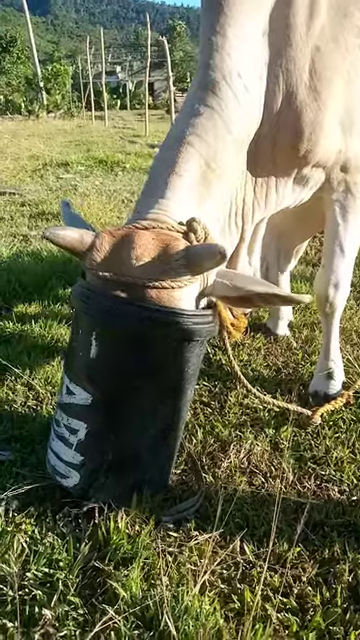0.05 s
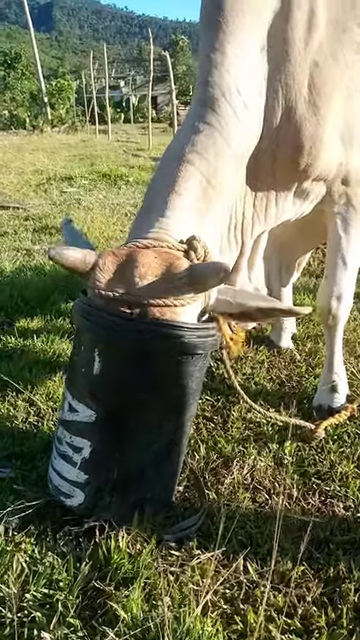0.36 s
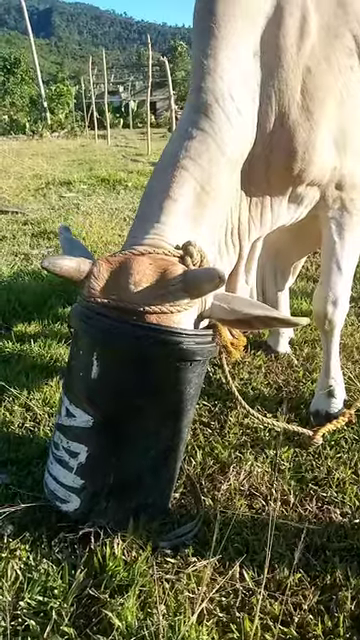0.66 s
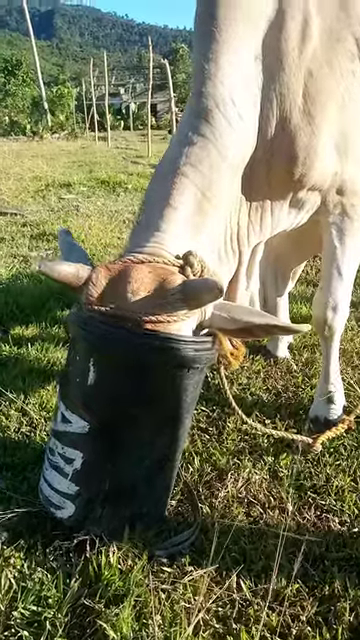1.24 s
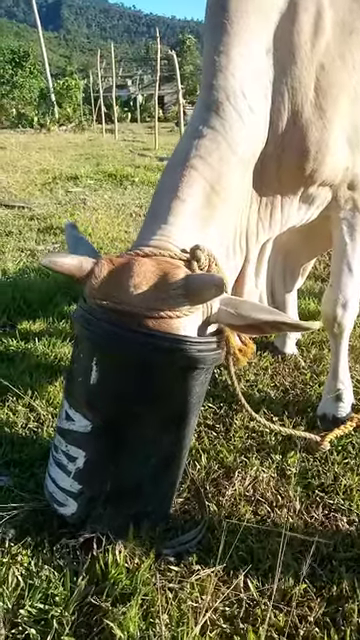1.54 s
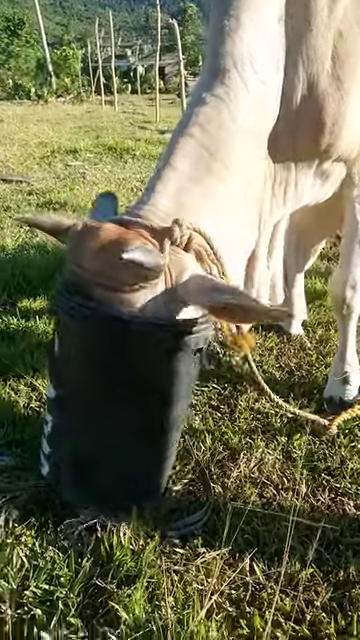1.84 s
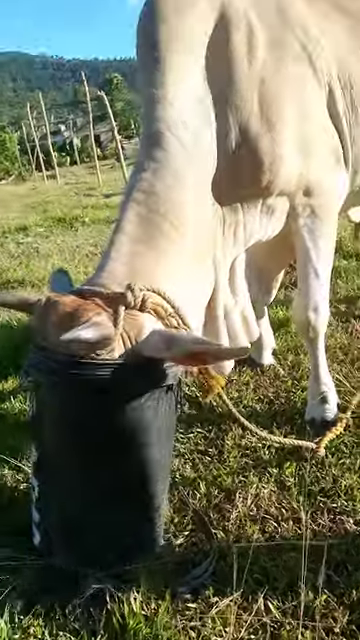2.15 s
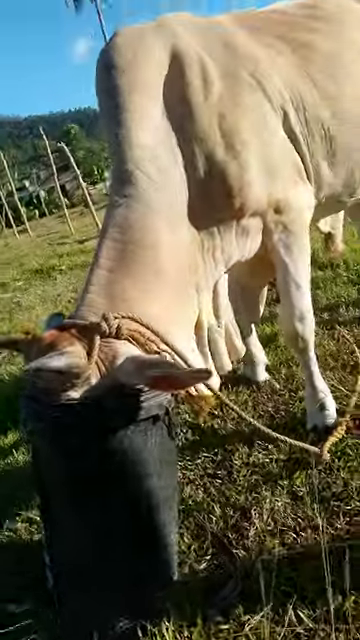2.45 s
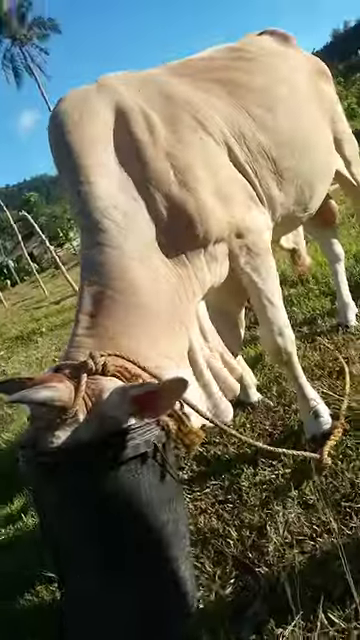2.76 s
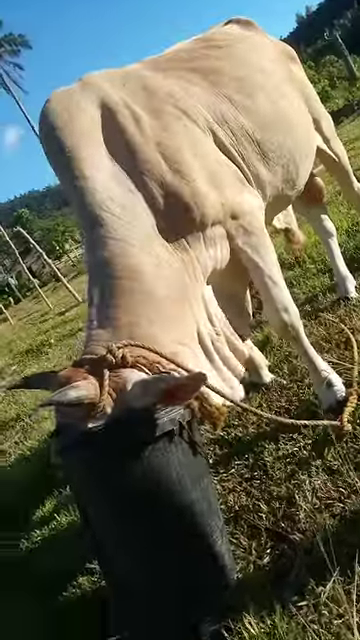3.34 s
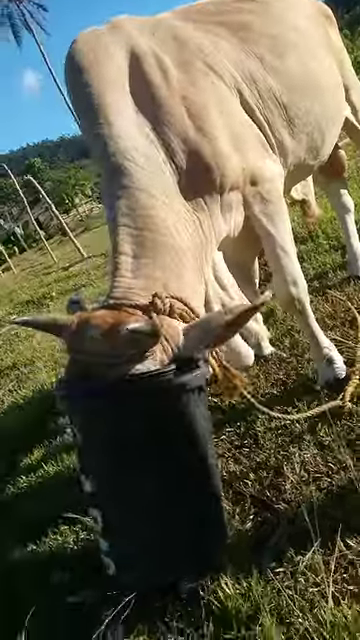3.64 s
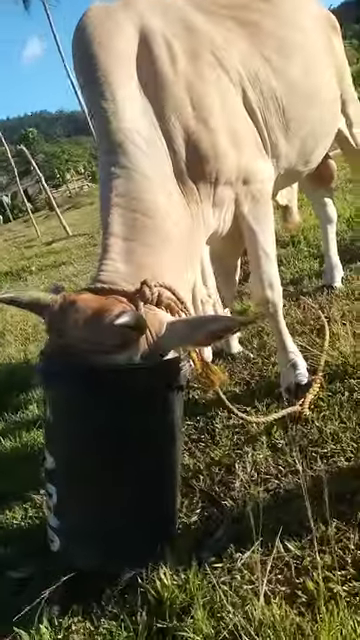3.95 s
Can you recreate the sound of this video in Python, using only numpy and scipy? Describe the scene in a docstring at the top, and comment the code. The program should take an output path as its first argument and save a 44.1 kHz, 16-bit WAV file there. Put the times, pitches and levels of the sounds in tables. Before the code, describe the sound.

A cow snorting softly while feeding from a plastic bucket, with wind buffeting the microphone.

```python
"""Wind thumps and hollow snorts: a cow feeds with its head deep in a plastic bucket, in an open field.
It blows through its nostrils about every 0.8 s, in one or two puffs, coloured by the bucket's air.
Its muzzle rustles and clicks in the feed, and the halter scrapes the rim.
Gusts buffet the microphone over a faint hiss; a very high fizz swells four times."""
import sys
import numpy as np
from scipy import signal
from scipy.fft import rfft, irfft
from scipy.io import wavfile
from scipy.ndimage import uniform_filter1d

SR = 44100
rng = np.random.default_rng(int(sys.argv[2]) if len(sys.argv) > 2 else 0)


def store_wav(level_fs):
    """Save 16-bit WAV to argv[1]."""
    pcm = np.round(np.clip(np.atleast_2d(level_fs), -1, 1) * 32767)
    wavfile.write(sys.argv[1], SR, pcm.T.astype(np.int16))


N = 176400
TIME_S = np.arange(N) / SR
FREQ_HZ = np.fft.rfftfreq(N, 1 / SR)

# Nostril puffs. Each row: start, crest and end in seconds; level, swell to the crest, treble shelf
# and jet hiss in dB; rasp pitch in Hz, rasp gain in dB.
NOSTRIL_PUFFS = [(0.246, 0.33, 0.45, -51, 6.5, -6, -18, 2320, -13),
                 (1.051, 1.105, 1.194, -48.5, 12, -7.5, -27.5, 2370, -13),
                 (2.013, 2.01, 2.08, -53.5, 14, -1, -37, 2210, -10.5),
                 (2.079, 2.122, 2.14, -45, 14, 1.5, -30, 2340, -10.5),
                 (2.708, 2.733, 2.80, -52, 4, 2, -25, 2050, -13.5),
                 (2.808, 2.892, 2.913, -41, 3.5, 2, -23.5, 2230, -11),
                 (3.587, 3.632, 3.646, -50.5, 12.5, -20, -42, 2350, -29),
                 (3.70, 3.732, 3.742, -51, 5, -5, -24, 2410, -13)]
# Air leaving the nostrils. Each row: frequency in Hz, density in dB.
BREATH_SPECTRUM = [(100, -11), (300, -3), (480, -0.5), (850, -5), (1030, -10.5), (1250, -8), (1500, -15.5),
                   (1700, -12), (2600, -14), (3200, -21), (4300, -35.5), (5200, -38.5), (10000, -38),
                   (16000, -70)]
# Air resonances of the bucket. Each row: frequency in Hz, width in Hz, lift in dB.
BUCKET_MODES = [(599, 28, 3.5), (800, 89, 4), (1293, 67, 3.5), (1705, 27, 7), (1850, 14, 0),
                (2280, 33, -0.5), (3350, 61, -2), (4030, 74, 4.5)]
# Tones blown in the bucket. Each row: centre and half length in seconds, pitch in Hz, level in dB.
BUCKET_HOOTS = [(0.35, 0.064, 592, -55), (0.37, 0.035, 810, -54), (0.38, 0.027, 386, -45),
                (.48, 0.025, 540, -68.5), (.632, 0.014, 565, -62.5), (1.108, 0.016, 595, -42),
                (1.115, 0.0076, 715, -44), (1.143, 0.012, 595, -47.5), (2.84, 0.039, 670, -52),
                (2.897, 0.016, 2295, -48.5), (3.635, 0.013, 785.2, -53)]
# Muzzle rubbing the feed. Each row: time in seconds, level in dB.
RUB_LEVELS = [(0, -71.5), (.5, -64), (.58, -68.5), (.95, -84), (1.22, -68.5), (1.45, -112), (1.6, -72.5),
              (1.75, -59), (1.89, -63), (1.98, -61.5), (2.08, -63), (2.2, -67), (2.3, -62.5), (2.39, -65.5),
              (2.46, -63), (2.68, -59), (2.95, -62), (3.05, -68), (3.45, -74.5), (3.6, -62.5),
              (3.73, -60.5), (3.79, -65.5), (4, -71.5)]
# Feed rustle. Each row: frequency in Hz, density in dB.
FEED_SPECTRUM = [(200, -32), (430, -8.5), (570, 3.5), (870, 0), (1050, -5), (1300, -5), (1480, -11),
                 (1800, -0.5), (2500, -1.5), (3200, -11), (4100, -9.5), (5200, -16), (6600, -11.5),
                 (8300, -19.5), (10800, -11.5), (12500, -40), (15500, -23)]
# Wet clicks. Each row: centre in seconds, level in dB, pitch and width in Hz, half length in seconds.
MOUTH_CLICKS = [(0.543, -60.5, 7600, 1790, 0.0028), (0.627, -55, 2200, 900, 0.021),
                (1.241, -62, 3650, 2500, 0.0094), (1.55, -60, 3180, 3520, 0.0097),
                (1.938, -50.5, 8000, 3000, 0.0017), (2.0289, -43, 2980, 1000, 0.0014),
                (2.029, -41.5, 6740, 1500, 0.00093), (2.0293, -44, 12400, 8000, 0.0006),
                (2.476, -59, 9000, 9000, .0015), (2.498, -49.5, 2210, 1190, 0.0023),
                (2.987, -54, 3180, 2500, 0.0033), (3.187, -66, 14000, 5000, 0.0012),
                (3.344, -54.5, 5330, 705, 0.003), (3.345, -60, 2150, 500, 0.0029),
                (3.812, -45, 2270, 685, 0.0024), (3.813, -46.5, 3080, 700, 0.003)]
# Halter on the rim. Each row: centre and half length in seconds, level in dB.
SCRAPE_SWELLS = [(1.885, 0.079, -58)]
# Rope friction. Each row: frequency in Hz, density in dB.
SCRAPE_SPECTRUM = [(300, -14), (800, 11.5), (1000, 3.5), (1500, -11), (2000, 5.5), (4200, -7), (5200, -15),
                   (7000, -11), (11000, -14), (12500, -34)]
# Gust strength. Each row: time in seconds, level in dB.
GUST_LEVELS = [(0.0, -69), (0.2, -62), (0.26, -43.5), (0.36, -61.5), (0.53, -59.5), (0.57, -57.5),
               (0.63, -65), (0.68, -45), (0.7, -43.5), (0.75, -65), (0.78, -44), (0.81, -62), (0.89, -38.5),
               (0.98, -50), (1.04, -36.5), (1.12, -39.5), (1.16, -56), (1.19, -34.5), (1.285, -31),
               (1.31, -38.5), (1.35, -29.5), (1.39, -37), (1.5, -34.5), (1.53, -58.5), (1.56, -39),
               (1.67, -38.5), (1.69, -46.5), (1.752, -43), (1.765, -32), (1.8, -29.5), (1.87, -45),
               (1.89, -36), (1.93, -40.5), (2.02, -36), (2.19, -45), (2.23, -60), (2.27, -42), (2.31, -55),
               (2.36, -46.5), (2.47, -50.5), (2.51, -46), (2.68, -66), (2.74, -45.5), (2.77, -58),
               (2.81, -46.5), (3.01, -53), (3.09, -35), (3.17, -42.5), (3.22, -43), (3.25, -50.5),
               (3.27, -40.5), (3.4, -47), (3.45, -35), (3.5, -39), (3.56, -35), (3.63, -49.5), (3.65, -42),
               (3.74, -39), (3.8, -59.5), (3.91, -63), (3.93, -48.5), (4.0, -35.5)]
# Wind rumble. Each row: frequency in Hz, density in dB.
RUMBLE_SPECTRUM = [(20, -32), (40, -9.5), (75, 1), (135, 1), (200, -8.5), (300, -24), (450, -44),
                   (800, -61), (2000, -111)]
# Rough edge of strong gusts. Each row: frequency in Hz, density in dB.
EDGE_SPECTRUM = [(60, -27.5), (160, 2.5), (260, 1.5), (400, -9.5), (600, -20), (900, -41), (1400, -60),
                 (3000, -87)]
# Hard gusts tearing at the microphone port. Each row: centre and half length in seconds, level in dB.
TEAR_SWELLS = [(1.332, 0.011, -59), (1.776, 0.012, -45)]
# Tearing noise at the port. Each row: frequency in Hz, density in dB.
TEAR_SPECTRUM = [(250, -29), (500, 0), (750, 6), (1100, -14), (1500, -33), (3000, -61)]
# Single eddies hitting the microphone. Each row: centre in seconds, level in dB, width in seconds.
EDDIES = [(0.575, -41.5, 0.0044), (0.672, -38, 0.0018), (0.685, -38, 0.0029), (.883, -32.5, 0.0015),
          (1, -33, 0.0015), (1.119, -26, 0.0015), (1.262, -24.5, 0.0015), (1.287, -28, 0.0011),
          (1.323, -29, 0.00096), (1.364, -22.5, 0.0017), (1.504, -21, 0.0032), (1.765, -25, .0014),
          (1.795, -24.5, 0.0011), (2.18, -31.5, 0.0028), (3.085, -25, 0.0019), (3.221, -29.5, 0.003),
          (3.284, -24, 0.0026), (3.56, -31, 0.0012), (3.732, -29.5, 0.0023), (3.941, -30, 0.0019),
          (3.991, -29, 0.0032)]
# Swells of high fizz. Each row: centre and half length in seconds, level in dB.
FIZZ_SWELLS = [(1.88, .12, -78), (2.72, 0.18, -73), (3.2, 0.093, -81), (3.65, 0.2, -71.5)]
# Colour of the fizz. Each row: frequency in Hz, density in dB.
FIZZ_SPECTRUM = [(2000, -21), (4000, -6), (7000, 0), (11000, 12), (13000, 0), (15500, 12)]
# Background hiss. Each row: frequency in Hz, density in dB.
HISS_SPECTRUM = [(30, 11), (120, 8), (350, -22.5), (700, -6), (1400, -3), (2300, 1.5), (3000, -9),
                 (3800, 0.5), (5100, -10.5), (6200, -6.5), (8000, -15.5), (9500, -3.5), (10800, -0.5),
                 (11500, -4.5), (12300, -30), (16000, -17.5)]


def nostril_puffs(rise_s=0.0086, release_s=0.0089, sag_db=2.5, brighten_db=4, flutter_hz=69.6):
    """Fluttering, rasping breath swells, sags and stops; it brightens as the nostrils narrow."""
    out = np.zeros(N)
    air = colour(BREATH_SPECTRUM) * bucket_gain()
    treble = FREQ_HZ ** 2 / (FREQ_HZ ** 2 + 1420 ** 2)
    spray = amp(-62) * noise(band(hz=7300, width_hz=6500) ** 2)
    rattle = unit(np.exp(0.23 * noise(band(hz=170, width_hz=170))))
    for start_s, crest_s, end_s, db, swell_db, treble_db, jet_db, rasp_hz, rasp_db in NOSTRIL_PUFFS:
        flow = amp(db + np.interp(TIME_S, [start_s, crest_s, end_s], [-swell_db, 0, -sag_db]))
        flow *= np.exp(-np.maximum(start_s - TIME_S, 0) / rise_s)
        flow *= np.exp(-np.maximum(TIME_S - end_s, 0) / release_s)
        narrowing = amp(brighten_db * np.interp(TIME_S, [start_s, end_s], [-0.5, 0.5]))
        rush = noise(air * amp(treble_db * treble))
        top = filtered(rush, treble)
        rasp = amp(rasp_db) * noise(band(rasp_hz, width_hz=370) * air)
        jet = amp(jet_db) * noise(band(hz=4070, width_hz=2900) ** 2)
        out += flow * (rush - top + rattle * (narrowing * top + rasp) + narrowing ** 2 * jet)
        out += spray * (flow / amp(-41)) ** 2  # mainly on hard puffs
    flutter = np.exp(0.21 * noise(band(0, 2 * flutter_hz)))
    return out * flutter


def bucket_gain():
    """Air modes of the bucket, as gain per frequency."""
    return amp(sum(lift_db * band(hz, width_hz) for hz, width_hz, lift_db in BUCKET_MODES))


def bucket_echo(x, t60_s=0.12, wet=0.3):
    """Close echoes between the walls add a short hollow tail."""
    time_s = TIME_S[:SR // 4]
    tail = rng.standard_normal(len(time_s)) * amp(-60 * time_s / t60_s)
    echo = signal.fftconvolve(x, tail / np.linalg.norm(tail))[:N]
    return (x + wet * echo) / np.hypot(1, wet)


def bucket_hoots(waver_depth_hz=13, waver_rate_hz=55):
    """Air blown past the rim sounds brief wavering tones, as over a bottle."""
    out = np.zeros(N)
    slow = band(0, 2 * waver_rate_hz)
    for centre_s, half_s, hz, db in BUCKET_HOOTS:
        pitch_hz = hz + waver_depth_hz * noise(slow ** 2)
        roughness = np.exp(0.25 * noise(slow))
        tone = np.sqrt(2) * np.sin(2 * np.pi * np.cumsum(pitch_hz) / SR)
        out += amp(db) * bell(centre_s, half_s) * roughness * tone
    return out


def feed_rustle(body_hz=1130, firm_db=-60):
    """The muzzle rubs through crumbs; firm rubbing brings out the bucket's low body."""
    friction = grainy(patchy(rng.standard_normal(N), depth_db=4.5))
    rustle = unit(filtered(friction, colour(FEED_SPECTRUM) * bucket_gain() ** 0.99))
    body = filtered(rustle, 1 / (1 + (FREQ_HZ / body_hz) ** 8))
    force = level(RUB_LEVELS)
    firmness = np.minimum(force / amp(firm_db), 1)
    return force * (rustle - body + firmness * body)


def mouth_clicks():
    """Short wet smacks of tongue and lips."""
    return sum(amp(db) / 2 * bell(centre_s, half_s) * noise(band(hz, width_hz))
               for centre_s, db, hz, width_hz, half_s in MOUTH_CLICKS)


def halter_scrape():
    """Rope drags over the rim: broad, grainy friction."""
    friction = grainy(noise(1))
    return swells(SCRAPE_SWELLS) * unit(filtered(friction, colour(SCRAPE_SPECTRUM)))


def wind(strong_gust_db=-33.5, edge_growth=1.495, lump_hz=31, low_cut_hz=37):
    """Turbulence at the microphone: rumble, a lumpy edge in gusts, tearing and single eddies."""
    gust = level(GUST_LEVELS)
    out = amp(-0.9) * gust * steadied(noise(colour(RUMBLE_SPECTRUM)))
    edge = steadied(noise(colour(EDGE_SPECTRUM)))
    lumps = np.exp(0.43 * noise(band(0, 2 * lump_hz)))
    out += amp(-44) * (gust / amp(strong_gust_db)) ** edge_growth * unit(edge * lumps)
    out += swells(TEAR_SWELLS) * noise(colour(TEAR_SPECTRUM))
    for centre_s, db, width_s in EDDIES:
        offset = (TIME_S - centre_s) / (2 * width_s)
        out += amp(db) * np.real((1 + 1j * offset) ** -4)  # pressure peak between two dips
    return filtered(out, FREQ_HZ ** 4 / (FREQ_HZ ** 4 + low_cut_hz ** 4))


def treble_fizz():
    """Faint, very high fizz of dense tiny ticks, swelling four times."""
    fizz = ticks(per_s=1500, spread_db=1.5)
    return swells(FIZZ_SWELLS) * unit(filtered(fizz, colour(FIZZ_SPECTRUM)))


def background_hiss(level_db=-71):
    """Faint hiss with a slight random flicker in tone colour."""
    return amp(level_db) * patchy(noise(colour(HISS_SPECTRUM)), depth_db=2.8)


def amp(db):
    """Decibels to gain."""
    return 10 ** (np.asarray(db) / 20)


def unit(x):
    """Scales to rms 1."""
    return x / np.sqrt(np.mean(x ** 2) + 1e-20)


def colour(spectrum):
    """Spectrum table to gain per frequency."""
    hz, db = np.transpose(spectrum)
    return amp(np.interp(np.log(FREQ_HZ + 1), np.log(hz), db))


def band(hz, width_hz):
    """One resonance, as gain per frequency."""
    return 1 / (1 + ((FREQ_HZ - hz) / (width_hz / 2)) ** 2)


def filtered(x, gain):
    """Applies a gain per frequency."""
    return irfft(rfft(x) * gain, N)


def noise(gain):
    """Shaped noise of rms 1."""
    return unit(filtered(rng.standard_normal(N), gain))


def level(points):
    """Level table to gain per sample."""
    return amp(np.interp(TIME_S, *np.transpose(points)))


def bell(centre_s, half_s):
    """Gaussian envelope of peak 1."""
    return np.exp(-((TIME_S - centre_s) / half_s) ** 2)


def swells(rows):
    """Sum of bell envelopes."""
    return sum(amp(db) * bell(centre_s, half_s) for centre_s, half_s, db in rows)


def ticks(per_s, spread_db):
    """Random ticks, most small, a few large."""
    hits = rng.random(N) < per_s / SR
    signs = rng.choice([-1, 1], N)
    sizes = amp(spread_db * np.minimum(rng.exponential(1, N), 4))
    return unit(hits * signs * sizes)


def grainy(x):
    """Adds crumb-like ticks to friction noise."""
    return x + 0.37 * ticks(per_s=220, spread_db=5.5)


def steadied(x, share=0.85, window_samples=800):
    """Takes a share of the chance swells out of a noise."""
    power = uniform_filter1d(x ** 2, window_samples)
    power = abs(uniform_filter1d(power, window_samples)) + 1e-9
    return unit(x / power ** (share / 2))


def patchy(x, depth_db, even_above_hz=10200):
    """Random spectral drift in patches of about 60 ms by 350 Hz, fading out in the top treble."""
    hz, _, frames = signal.stft(x, SR, nperseg=1024, noverlap=768)
    drift = uniform_filter1d(rng.standard_normal(frames.shape), size=10, axis=1)
    patches = unit(uniform_filter1d(drift, size=8, axis=0))
    gain_db = depth_db * patches / (1 + (hz[:, None] / even_above_hz) ** 4)
    _, out = signal.istft(frames * amp(gain_db), nperseg=1024, noverlap=768)
    return unit(out[:N])


def scene():
    """Cow, wind, fizz and hiss in mono."""
    gusts = wind()
    cow = bucket_echo(nostril_puffs() + feed_rustle()) + bucket_hoots() + mouth_clicks()
    return (cow + treble_fizz() + halter_scrape() + gusts + background_hiss())[None]


def record(dry):
    """Band limit at 15.9 kHz."""
    lowpass = signal.firwin(511, 15900, window=("kaiser", 9), fs=SR)
    return signal.oaconvolve(dry, lowpass[None], "same")


dry = scene()
out = record(dry)
store_wav(out)
```